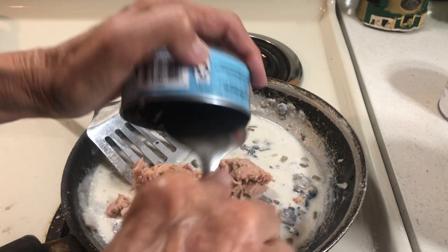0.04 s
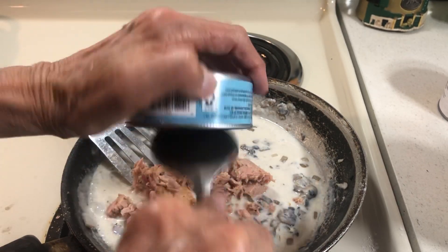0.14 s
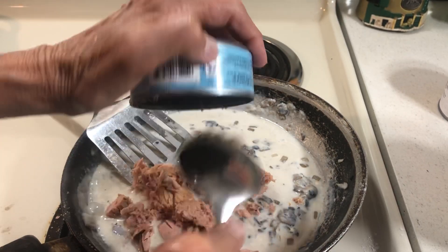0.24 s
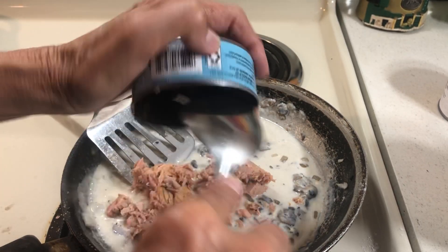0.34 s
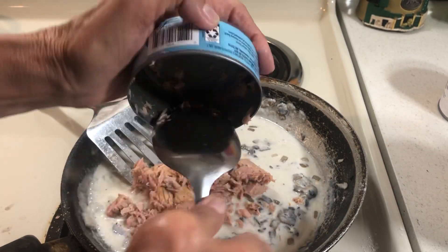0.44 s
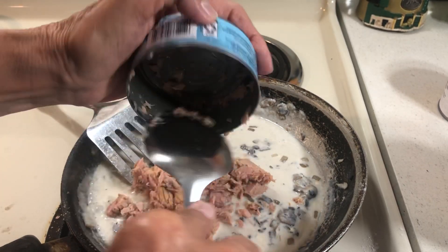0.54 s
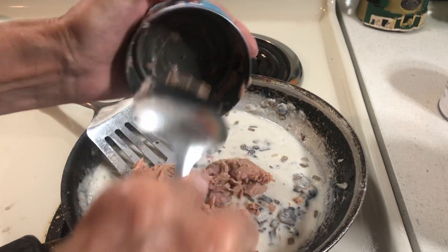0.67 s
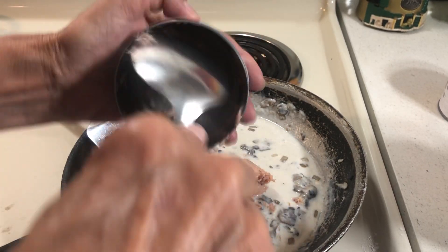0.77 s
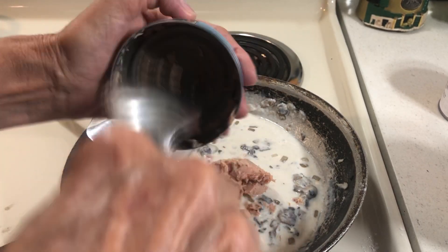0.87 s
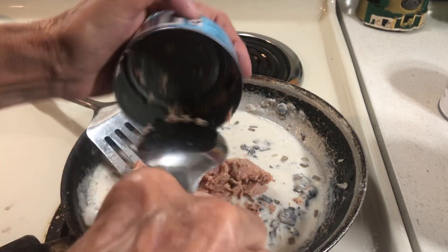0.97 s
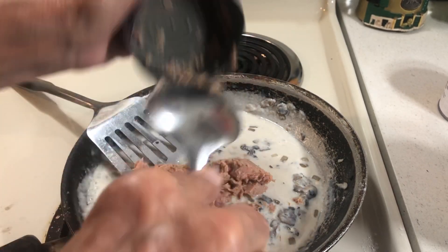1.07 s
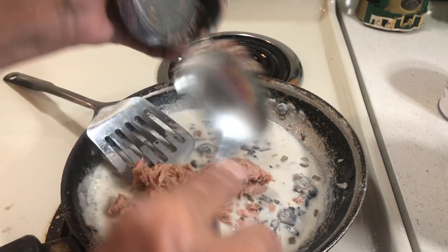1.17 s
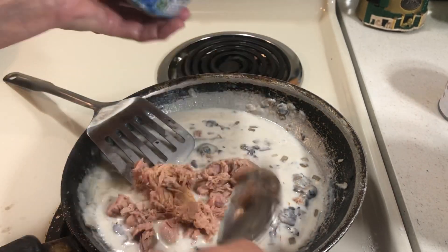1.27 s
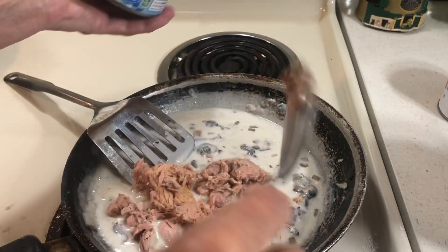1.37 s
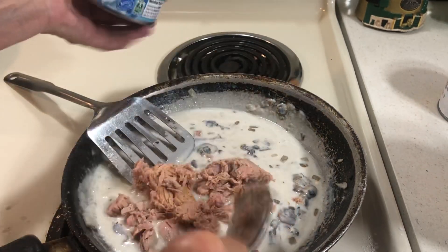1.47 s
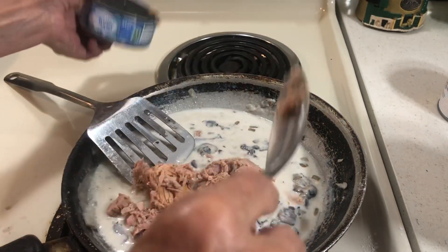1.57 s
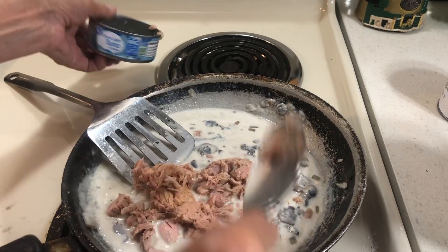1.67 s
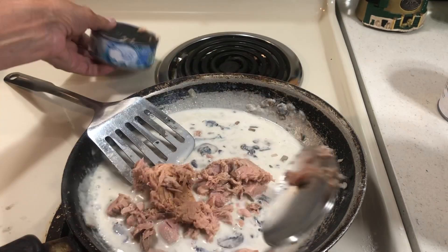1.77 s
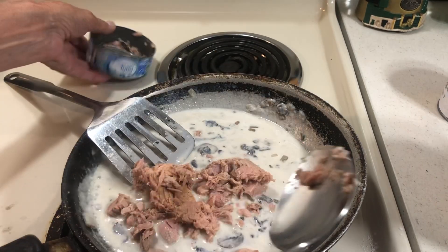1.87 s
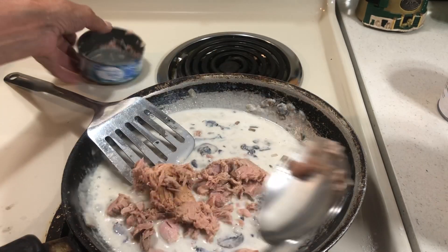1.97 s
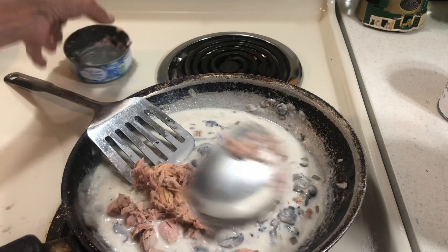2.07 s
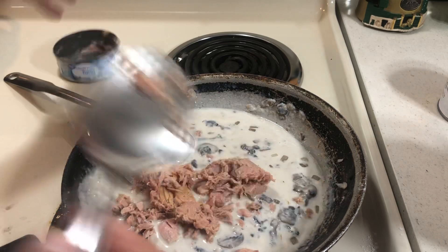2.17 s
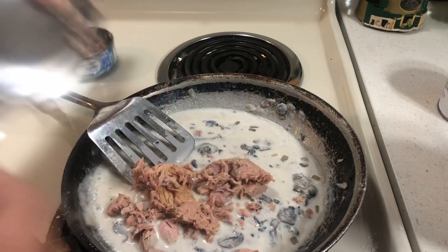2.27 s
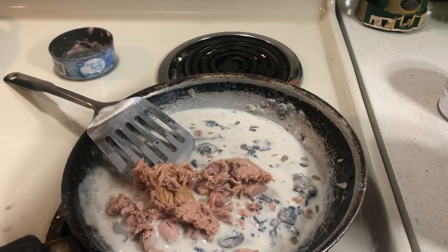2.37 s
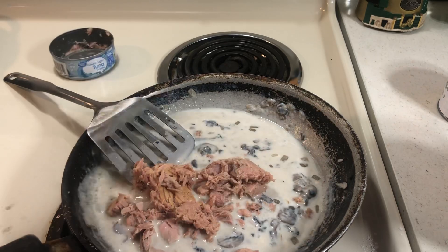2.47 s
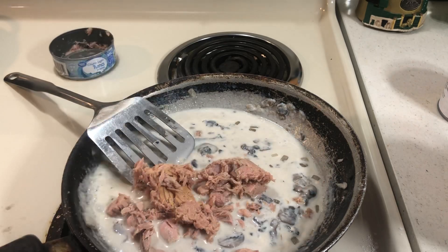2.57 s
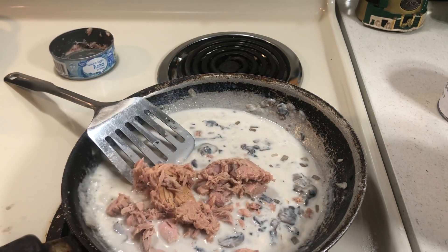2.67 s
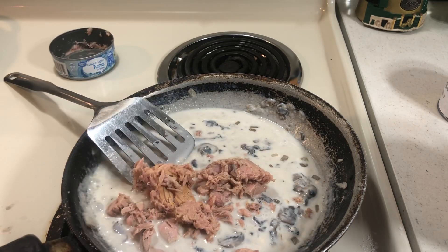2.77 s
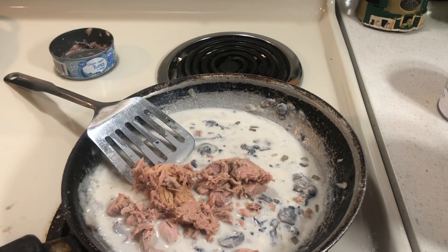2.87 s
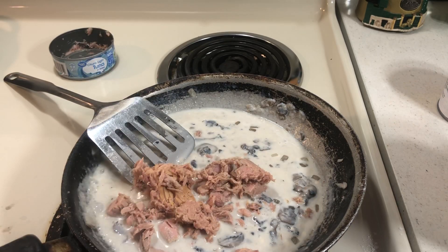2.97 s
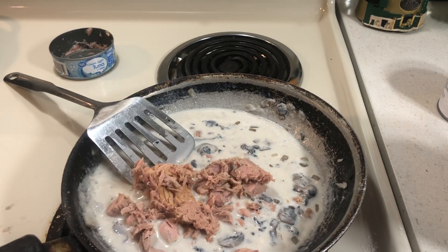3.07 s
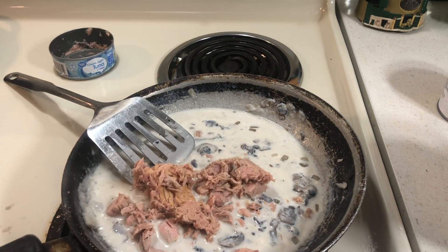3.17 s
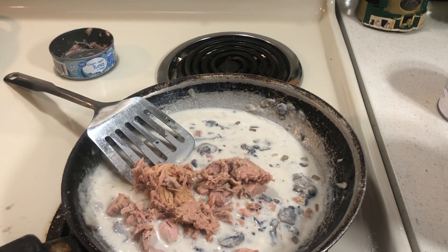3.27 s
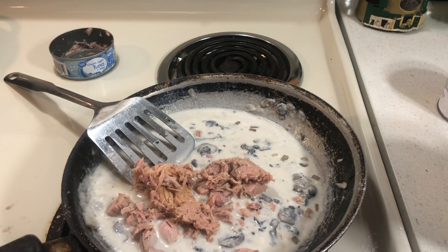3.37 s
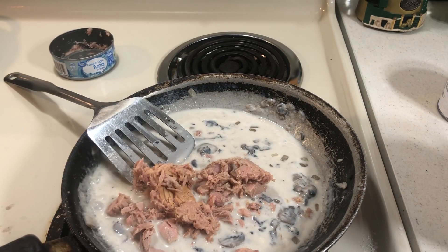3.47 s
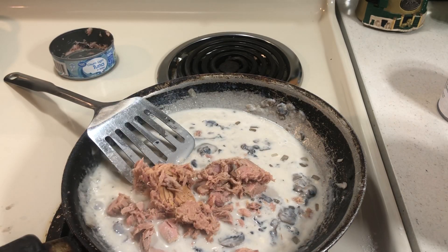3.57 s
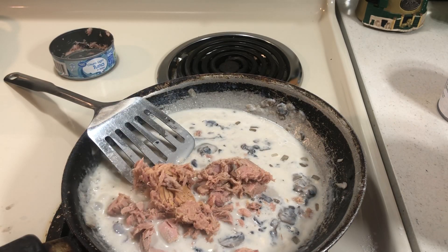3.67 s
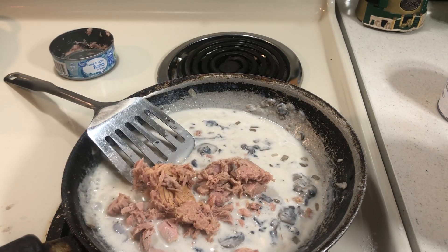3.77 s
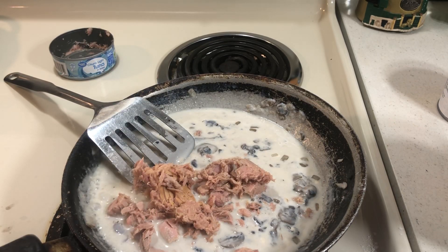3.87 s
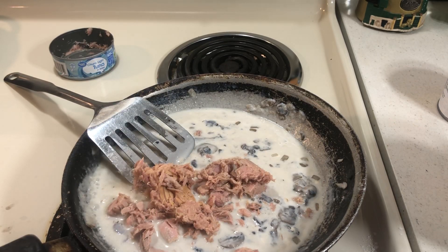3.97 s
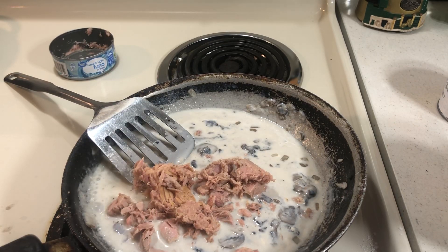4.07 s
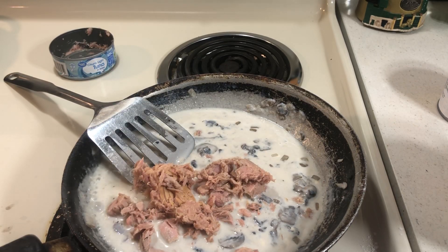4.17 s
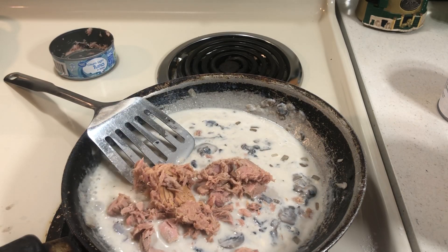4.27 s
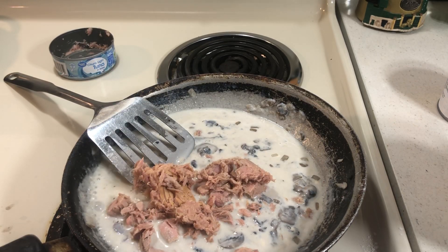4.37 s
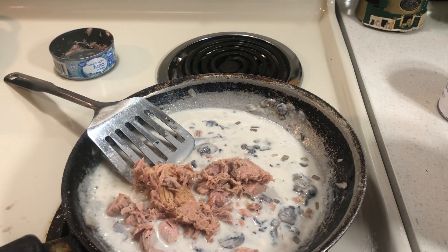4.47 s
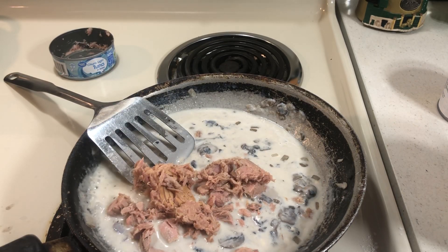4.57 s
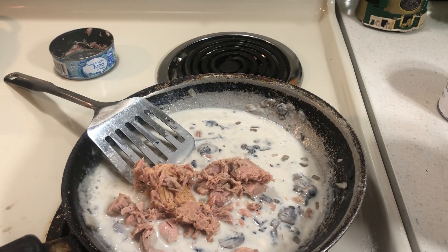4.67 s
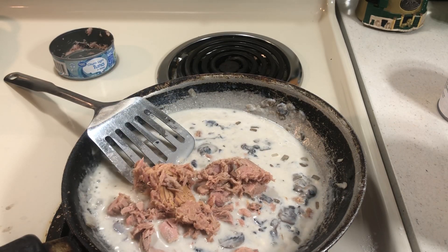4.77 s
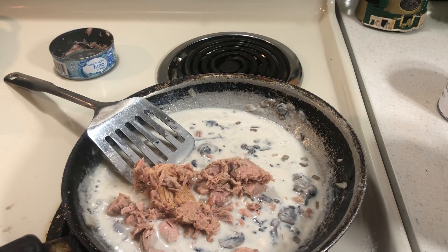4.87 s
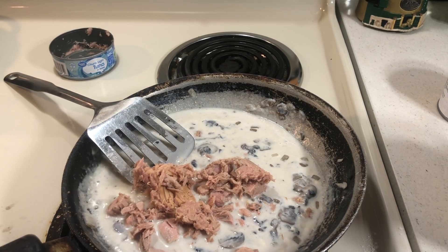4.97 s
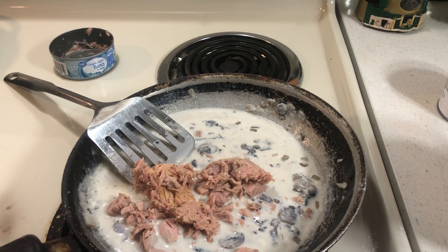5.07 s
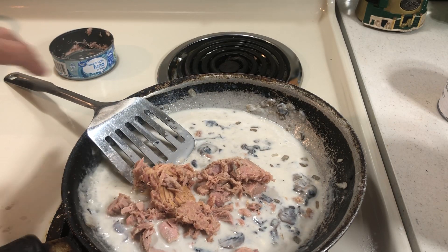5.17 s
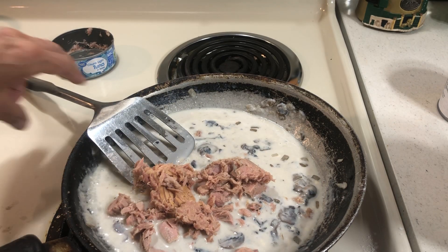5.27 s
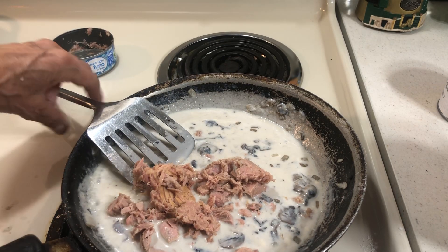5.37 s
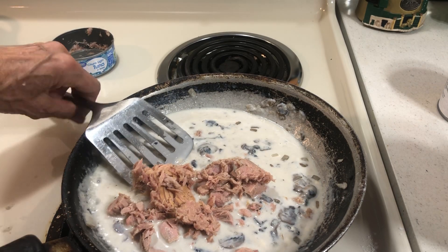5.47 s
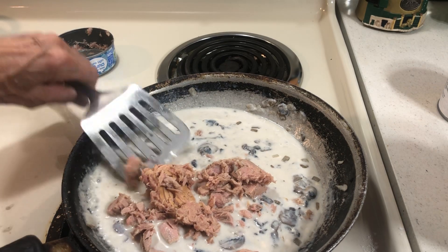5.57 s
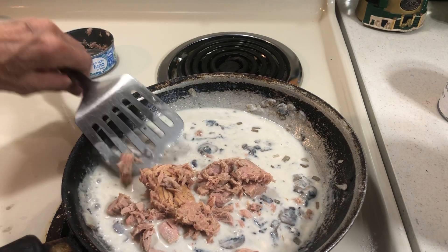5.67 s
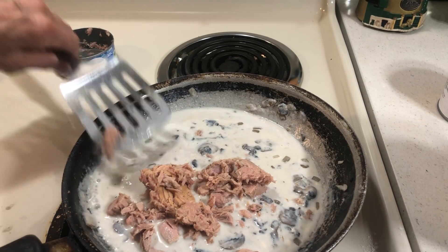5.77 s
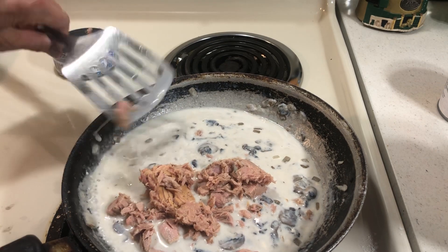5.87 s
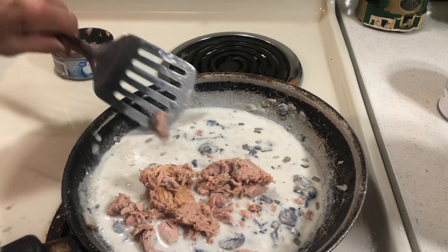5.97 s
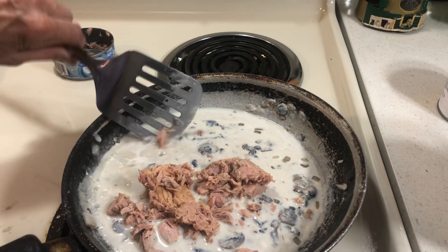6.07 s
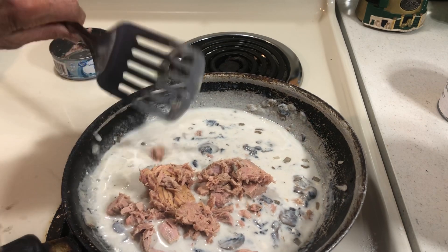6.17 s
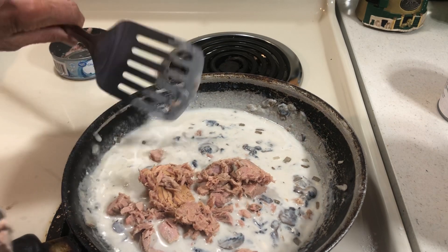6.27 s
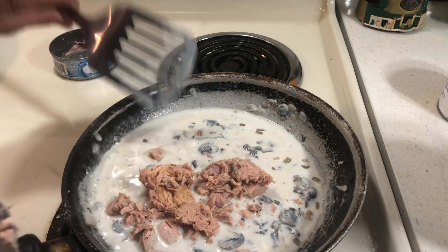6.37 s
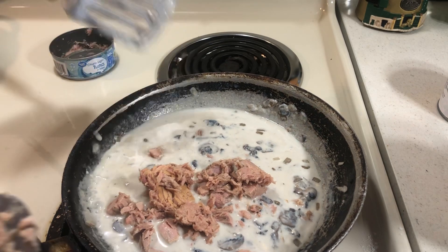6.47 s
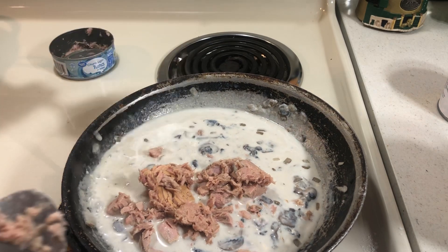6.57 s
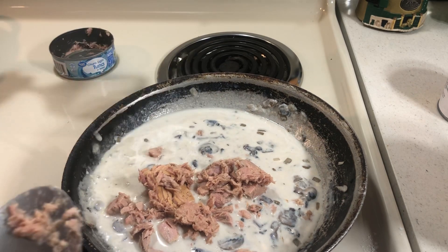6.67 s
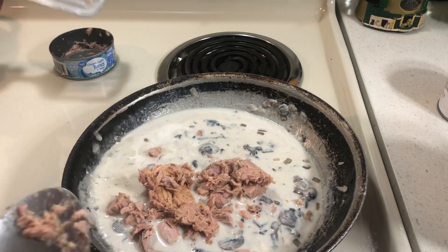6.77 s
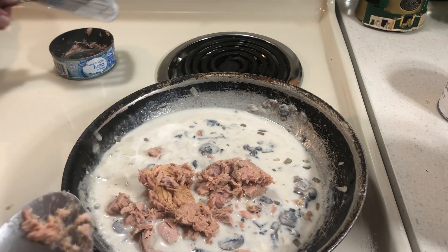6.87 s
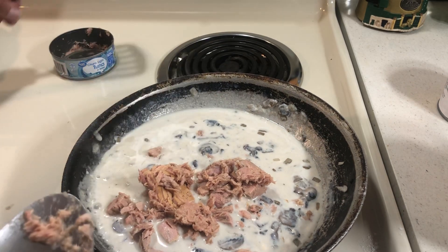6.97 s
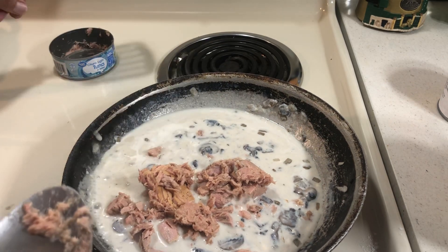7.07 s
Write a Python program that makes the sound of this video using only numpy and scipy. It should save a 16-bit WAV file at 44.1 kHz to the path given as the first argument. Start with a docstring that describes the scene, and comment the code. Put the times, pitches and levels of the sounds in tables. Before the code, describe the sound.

Quick tinny knocks and short gritty scrapes of a spoon on a can open the scene, followed by the can's hard landing and accelerating wobble on a stove. Then mostly gentle bubbling, faint sizzling flares and steady fan hum remain. Near the end a spatula softly taps the pan and is set down with a thin clink, followed by a small scrape. Close microphone, short indoor reverberation.

```python
"""A small kitchen, heard from just above a skillet of sauce; bubbles plop throughout over fan, hum and faint fizz.
First a steel spoon knocks and scrapes a tin: noise bursts and decaying modes for blows, random slips for scrapes.
Before two seconds the tin drops on the enamel stove top and rocks ever faster on its rolling rim.
From three seconds the fizz flares at times; near six a spatula taps the skillet, near seven it is laid down.
A last short scrape follows. Bubbles are rising sines with torn noise; the room is a decaying noise tail."""
import sys
import numpy as np
from scipy import signal
from scipy.fft import rfft, next_fast_len
from scipy.io import wavfile
from scipy.ndimage import uniform_filter1d

SR = 44100
rng = np.random.default_rng(int(sys.argv[2]) if len(sys.argv) > 2 else 0)


def unload_audio(sound):
    """Save the sound as a 16-bit wav file, at the path given as the first command line argument."""
    columns = np.transpose(np.atleast_2d(sound))
    # keep every value between -1 and 1, then stretch to whole-number steps
    steps = np.round(np.clip(columns, -1, 1) * 32767)
    wavfile.write(sys.argv[1], SR, steps.astype(np.int16))


N = 314433
TIME = np.arange(N) / SR

# Spoon on the tin's wall: (time [s], middle level [dB], treble against middle [dB], contact swell [s])
SPOON_BLOWS = [(.0092, -35, 7.5, .00012), (0.0276, -25, -1, 0.000078), (.414, -40, -8.5, 0.00102),
               (.436, -34.5, 8, 0.000058), (.443, -34, 4, .0002), (.465, -40, -1, .0003),
               (.759, -31, -11, .0017), (.768, -23, 2, 0.00026), (.9425, -26, -13.5, 0.000217),
               (.9485, -28.5, 8.5, 0.0000598), (1.609, -42, 1.5, .00005), (1.615, -42, -13, .0004)]
# Single blows, for the next three tables as well: (time [s], low level [dB], middle level [dB],
# high level [dB], clatter t60 [s], contact swell [s], ring against clatter [dB])
# Spoon on the tin's base
BASE_KNOCK = [(.3787, -35.5, -21, -32.5, 0.016, 0.000276, 2.5)]
# Tin dropped on the stove top: columns as for single blows
TIN_LANDING = [(1.832, -22.5, -10.5, -19, 0.238, 0.000061, 1)]
# Spatula tapping the skillet: columns as for single blows
SKILLET_TAP = [(6.0397, -32.5, -33, -47.5, 0.075, 0.000097, 0)]
# Spatula laid down: columns as for single blows
SPATULA_LAID = [(6.9457, -46.5, -36, -25.5, 0.109, 0.00066, -1.37),
                (6.958, -58, -39.5, -34, 0.13, 0.0013, 2.05)]
# The tin rocking on its rim: (time [s], middle level [dB])
ROCKS = [(2.003, -21.5), (2.106, -20.5), (2.200, -21), (2.286, -19), (2.358, -16), (2.411, -18),
         (2.443, -23.5)]
# Strokes of steel over metal: (peak time [s], level [dB], rise by 20 dB [s], fall by 20 dB [s])
SCRAPE_STROKES = [(0, -40, .02, 0.0751), (.533, -41.5, 0.0633, 0.0147), (.908, -28, 0.0433, 0.048),
                  (0.943, -34.5, 0.0009, 0.1215), (1.5, -63, 0.44, 0.38), (7.13, -40, 0.0492, .05)]
# Edges between the low, middle and high bands of a blow: (lower [Hz], upper [Hz])
BLOW_BANDS = 800, 3300

# Mode tables hold nominal values, which each contact detunes, weights and damps.
# Modes of the tin's wall: (frequency [Hz], level [dB], t60 [s])
WALL_MODES = [(535.5, 0.5, 0.196), (1473.8, 1.5, 0.174), (1558.3, -5, 0.16813), (1664, -8.5, 0.086),
              (2088, 1, 0.143), (2210, -10.5, .08), (2737, 3.5, 0.1), (2867, -0.5, 0.11),
              (3530, -12.5, 0.34), (3930, -14.5, .22), (4537, 4.5, 0.042), (4548, 1, 0.11),
              (4470, -9, 0.278), (4697, 0.5, 0.091), (5350, -19.5, 0.155), (5796, 3.5, 0.091),
              (6365, -4.5, 0.092), (8282, -10.5, 0.1087), (8210, -11, 0.13), (8520, -19, .2),
              (8640, -15.5, .13), (9195, -21.5, .2), (12050, -8.5, 0.0698)]
# Modes of the tin's flat base: (frequency [Hz], level [dB], t60 [s])
BASE_MODES = [(642.3, -2.5, 0.098), (1197, 3, 0.1044), (1746, 2.5, 0.037), (1854, -5, .05),
              (2280, -7.5, 0.065), (2683, -4.5, 0.067), (3670, -11.5, 0.098), (4350, -17.5, 0.084),
              (6240, -15.5, .04), (8600, -18.5, 0.045)]
# Modes of the spoon's bowl: (frequency [Hz], level [dB], t60 [s])
BOWL_MODES = [(1899, -11, .1), (4460, -5, .09), (4440, -3.5, .08), (4534, -1.5, 0.12), (4628, -6, .15),
              (4774, -8, .12), (8230, -11, 0.1), (8410, -10, 0.11255), (8790, -12.5, 0.1036)]
# Modes of tin and stove top together: (frequency [Hz], level [dB], t60 [s])
STOVE_MODES = [(322, -28, 0.18), (428.57, -16, 0.18), (485.56, 0, 0.553), (565, 6.5, 0.28),
               (845.3, 3, 0.23), (905.2, 2, 0.313), (928, 3, 0.393), (1057.5, 1.5, 0.287),
               (1159.2, -7, 0.533), (1270, -17.5, .22), (1408, -3.5, 0.141), (1506, 14.5, 0.124),
               (1704, 7, 0.122), (1753, -7.5, .22), (1940, -17.5, 0.21), (1950, -21.5, .2),
               (2542, 0.5, 0.185), (2590, -17.5, 0.21), (3200, -19, 0.18606), (3520, -3, 0.1903),
               (4494, 0, 0.12), (4482.9, 0.5, 0.124), (4430, -22, 0.11), (5910, -9.5, 0.182),
               (6070, -1.5, 0.11), (7550, -10.5, .14)]
# Modes of the skillet: (frequency [Hz], level [dB], t60 [s])
SKILLET_MODES = [(276.3, 9.5, 0.111), (365, -6, 0.1), (857, -17.5, 0.082), (1200, -2, 0.15),
                 (1309, 3.5, 0.08), (2130, -11, 0.095), (5120, -12, 0.076), (5890, -13.5, .08)]
# Modes of the spatula: (frequency [Hz], level [dB], t60 [s])
SPATULA_MODES = [(1190, -29, .3), (1620, -24, .15), (1960, -13, .55), (2546, -17, .19), (2780, -16, .11),
                 (2993, -26, .35), (3284, -18, .19), (3700, -18, .19), (4199, -15, .16), (4400, -16, .14),
                 (5362, -1, .15), (5381, -7, .14), (5744, -13, .14), (6406, -17, .19), (6783, -14, .17),
                 (7397, -17, .17), (9292, -18, .17), (11760, -18, .16)]

# Colour of the wall's dense, short-lived modes: (frequency [Hz], level [dB])
WALL_TINT = [(100, -21), (250, -1.5), (550, -2.5), (800, -8.5), (1450, 9), (2330, -6.5), (3600, 6),
             (4600, 4.5), (5400, -1.5), (6800, 0.5), (8500, 4), (10500, -8), (12500, -1.5), (16000, -26.5)]
# Colour of the base's dense modes: (frequency [Hz], level [dB])
BASE_TINT = [(100, -15), (300, 12), (700, 0.5), (1250, -3.5), (2000, 3.5), (3500, -12), (5000, -10.5),
             (8500, -26), (10000, -30.5), (16000, -46)]
# Colour of the dense modes of tin and stove top: (frequency [Hz], level [dB])
STOVE_TINT = [(130, -34.5), (220, -3), (330, 5.5), (500, 2), (680, -2), (950, 4), (1550, 0), (2200, -1.5),
              (3500, -8.5), (4100, -20), (5100, -21), (6000, -13), (12000, -19.5), (16000, -35.5)]
# Colour of the skillet's dense modes: (frequency [Hz], level [dB])
SKILLET_TINT = [(100, -20.5), (280, 14.5), (550, -0.5), (1250, -4), (2000, -16), (3800, -23), (5500, -20.5),
                (8500, -24.5), (16000, -38)]
# Colour of the spatula's dense modes: (frequency [Hz], level [dB])
SPATULA_TINT = [(200, -10.5), (1200, -11.5), (2000, -20.5), (2800, -2.5), (4300, -6), (8000, 0.5),
                (12000, -2), (16000, -6.5)]
# Colour of the scraping slips: (frequency [Hz], level [dB])
SCRAPE_TINT = [(1000, -11.5), (1900, -6.5), (3300, 0), (4300, -3), (4850, -8.5), (5600, 1), (7000, -9.5),
               (8600, 0.5), (11000, -8.5), (14000, -7.5), (16000, -15.5)]

# The largest bubbles: (time [s], level before their common gain [dB], starting pitch [Hz])
LARGE_BUBBLES = [(1.638, -38, 675), (1.813, -33, 658), (2.674, -39, 684), (2.816, -39.5, 594),
                 (2.884, -40, 595), (3.368, -38.5, 624), (3.735, -35, 573), (4.127, -40.5, 643),
                 (4.195, -39, 559), (4.737, -38, 595), (5.209, -31, 626), (5.692, -39, 682),
                 (5.751, -36, 649), (6.603, -36, 641), (6.681, -35, 645), (6.737, -37, 584),
                 (6.835, -37, 616.4), (7.018, -38, 553)]
# Flares of fizz at the skillet's hot edge: (time [s], level [dB], half length [s])
FIZZ_FLARES = [(3.014, -61.5, 0.0455), (3.3, -67.5, 0.33), (4.474, -66, 0.149), (4.903, -55.5, 0.0248),
               (5.09, -60, 0.091), (5.484, -60, 0.059)]
# Spectrum of the kitchen air: (frequency [Hz], level [dB])
AIR_TINT = [(20, -10.5), (45, -5.5), (75, 3.5), (170, -1.5), (250, 5.5), (420, 2), (650, 1), (1000, -4),
            (1400, -10), (1900, -14.5), (2800, -17.5), (6000, -22.5), (10000, -29.5), (16000, -36.5)]
# Fan resonances: (frequency [Hz], width [Hz], rms level [dB])
FAN_RESONANCES = [(481.6, 12, -61.5), (1418.7, 30.9, -67), (2363, 112.8, -67.5), (3322.7, 420, -71)]
# Motor hum: (frequency [Hz], mean rms level [dB])
HUM_TONES = [(57.6, -66), (114, -68), (119.9, -52.5), (151.5, -70), (222.5, -63), (239.8, -62)]


def amp(db):
    """Decibels to gain."""
    return 10 ** (np.asarray(db) / 20)


def unit(x):
    """Scale to rms 1."""
    return x / np.sqrt(np.mean(x ** 2) + 1e-20)


def fade(t, t60):
    """Free decay by 60 dB in t60 seconds, from t = 0 on."""
    return np.exp(-np.log(1000) * np.maximum(t, 0) / t60)


def add(out, at_s, x):
    """Mix x into out from the given time."""
    i = int(round(at_s * SR))
    x, i = x[max(-i, 0):], max(i, 0)
    out[i:i + len(x)] += x[:max(len(out) - i, 0)]


def tint(x, colour):
    """Multiply the spectrum of x by a curve of (Hz, dB) points, at rms 1."""
    hz, db = np.transpose(colour)
    size = next_fast_len(len(x))
    f = np.maximum(np.fft.rfftfreq(size, 1 / SR), 1)
    gain = amp(np.interp(np.log(f), np.log(hz), db))
    return unit(np.fft.irfft(rfft(x, size) * gain, size)[:len(x)])


def band(x, hz, kind):
    """Third-order Butterworth filter."""
    return signal.sosfilt(signal.butter(3, hz, kind, fs=SR, output="sos"), x)


def walk(rate, size=N):
    """Smooth random wander of spread near 1, with `rate` new values a second."""
    k = int(SR / rate)
    steps = np.repeat(rng.standard_normal(size // k + 1), k)
    return 1.3 * uniform_filter1d(steps, k)[:size]


def ring(modes, t, damping=1, detune=0.0018):
    """Decaying modes; each contact weights and detunes them a little, and damping divides their t60."""
    hz, db, t60 = np.transpose(modes)[:, :, None]
    weight, shift, phase = rng.standard_normal((len(modes), 3)).T[:, :, None]
    tones = np.sin(2 * np.pi * (hz * (1 + detune * shift) * t + phase))
    return np.sum(amp(db + 2 * weight) * fade(t * damping, t60) * tones, axis=0)


def blows(table, modes, colour, crack_db, crack_t60, damping, detune, lowest_hz=200):
    """Each blow is a bright crack, a clatter of dense modes and a ring, balanced in three bands."""
    out, t = np.zeros(N), np.arange(-SR // 50, SR // 2) / SR
    low_edge, high_edge = BLOW_BANDS
    for at_s, low_db, mid_db, high_db, t60, swell, ring_db in table:
        contact = .5 + .5 * np.tanh(t / (2 * swell))
        clatter = unit(contact * fade(t, t60) * tint(rng.standard_normal(len(t)), colour))
        bright = band(rng.standard_normal(len(t)), (900, 13000), "band")
        crack = unit(contact * fade(t, crack_t60 + 10 * swell) * bright)
        body = unit(contact * ring(modes, t, damping, detune))
        hit = clatter + amp(crack_db) * crack + amp(ring_db) * body
        # small objects radiate no bass
        low = amp(low_db) * unit(band(hit, (lowest_hz, low_edge), "band"))
        mid = amp(mid_db) * unit(band(hit, (low_edge, high_edge), "band"))
        high = amp(high_db) * unit(band(hit, high_edge, "high"))
        # a level is the band's whole energy, taken as if it lasted 20 ms
        spread = np.sqrt(.02 * SR / len(t))
        add(out, at_s + t[0], spread * (low + mid + high))
    return out


def spoon_contacts(firm_db=-25, bass_db=-3.5, bass_per_db=0.67, t60=.027, growth_per_db=0.0187, ring_db=-4.5):
    """Rows for blows: a firmer stroke flexes the tin's base for more bass, and its clatter lasts longer."""
    rows = []
    for at_s, db, treble_db, swell in SPOON_BLOWS:
        firmness = db - firm_db
        low_db = db + bass_db + bass_per_db * firmness
        clatter_t60 = t60 * np.exp(growth_per_db * firmness)
        rows.append((at_s, low_db, db, db + treble_db, clatter_t60, swell, ring_db))
    return rows


def bowl(ring_db=-11, ring_per_treble_db=2.0, detune=.006):
    """The spoon's own modes: the sharper a contact, the more it rings the spoon itself."""
    out, t = np.zeros(N), TIME[:SR // 2]
    for at_s, db, treble_db, swell in SPOON_BLOWS:
        level = amp(db + ring_db + ring_per_treble_db * treble_db)
        add(out, at_s, level * np.tanh(t / (2 * swell)) * ring(BOWL_MODES, t, detune=detune))
    return out


def friction(force, modes, colour, slips_per_s, rough_db, ring_db, low_hz):
    """Tiny uneven slips, as strong as the stroke, excite metal that the lasting contact damps."""
    slips = (rng.random(N) < slips_per_s / SR) * rng.standard_normal(N)
    slips = slips * amp(rough_db * walk(400))
    body = unit(signal.fftconvolve(slips, ring(modes, TIME[:SR // 8], damping=6))[:N])
    rub = tint(slips, colour) + amp(ring_db) * body
    return force * unit(band(rub, low_hz, "high"))


def stroke(start_s, end_s, db, rise_s, fall_s):
    """Force of a rubbing contact: it grows, holds from start to end, and dies away."""
    before = np.maximum(start_s - TIME, 0) / rise_s
    after = np.maximum(TIME - end_s, 0) / fall_s
    return amp(db - 20 * (before + after))


def scraping_force():
    """Each stroke bites, peaks and slips off."""
    return sum(stroke(at_s, at_s, db, rise_s, fall_s) for at_s, db, rise_s, fall_s in SCRAPE_STROKES)


def rocking_contacts(bass_db=-11.5, treble_db=-4.5, t60=0.1232, swell_s=0.001197, swing_s=.1,
                     swell_power=1.59, ring_db=-4.0):
    """Rows for blows: the rim rolls into each landing, the more gently the longer the swing before it."""
    rows, previous_s = [], TIN_LANDING[0][0]
    for at_s, db in ROCKS:
        swell = swell_s * ((at_s - previous_s) / swing_s) ** swell_power
        rows.append((at_s, db + bass_db, db, db + treble_db, t60, swell, ring_db))
        previous_s = at_s
    return rows


def rolling_force(level_db=-41.5, rise_s=.06, fall_s=0.14):
    """The rim rolls evenly on the enamel from the first rock to the last."""
    return stroke(ROCKS[0][0], ROCKS[-1][0], level_db, rise_s, fall_s)


def plop(hz, t60=0.04014, glide=1.2, swell=0.001713, burst_db=-15, burst_t60=0.0826):
    """A bubble opens: its cavity rings for a few cycles, rising, while the wet skin tears."""
    t = TIME[:SR // 10]
    cavity = np.sin(2 * np.pi * hz * t * (1 + glide * t)) * fade(t, t60)
    skin = unit(band(rng.standard_normal(len(t)), (500, 1600), "band")) * fade(t, burst_t60)
    opening = 1 - np.exp(-(t / swell) ** 2)
    return opening * (cavity + amp(burst_db) * skin)


def sauce(large_db=7, small_db=-41, size_db=6, lowest_hz=565, pitch_spread=.25, count=150):
    """A few large bubbles among many small ones, some of them higher in pitch."""
    out = np.zeros(N)
    for at_s, db, hz in LARGE_BUBBLES:
        add(out, at_s, amp(db + large_db) * plop(hz))
    for at_s in rng.uniform(0, N / SR, count):
        size, pitch = rng.standard_normal(2)
        hz = lowest_hz * np.exp(pitch_spread * abs(pitch))
        add(out, at_s, amp(small_db + size_db * np.tanh(size)) * plop(hz))
    return out


def sizzle(steady_db=-73, flicker_db=1.32, pops_per_s=3500):
    """Random pops as fine fizz at the pan's hot edge: a faint flickering bed with short flares."""
    pops = (rng.random(N) < pops_per_s / SR) * rng.standard_normal(N)
    power = amp(steady_db) ** 2
    for at_s, db, half_s in FIZZ_FLARES:
        power = power + amp(db) ** 2 * np.exp(-2 * ((TIME - at_s) / half_s) ** 2)
    return np.sqrt(power) * amp(flicker_db * walk(40)) * unit(band(pops, (3500, 12000), "band"))


def room(x, wet_db=-12, t60_low=0.2686, t60_high=0.218, treble_db=-3, first_s=0.0017):
    """Reflections from stove back, counter and walls; the treble dies first."""
    t = TIME[:SR // 2]
    noise = rng.standard_normal(len(t))
    low = band(noise, 3200, "low") * fade(t, t60_low)
    high = amp(treble_db) * band(noise, 3010, "high") * fade(t, t60_high)
    tail = unit((low + high) * (t > first_s)) / np.sqrt(len(t))
    return x + amp(wet_db) * signal.fftconvolve(x, tail)[:N]


def kitchen(air_db=-50, waver_db=0.5, air_waver_db=1.0):
    """Moving air and fan resonances are filtered noise; a motor's hum is wavering sines."""
    out = amp(air_db + air_waver_db * walk(8)) * tint(rng.standard_normal(N), AIR_TINT)
    for hz, width, db in FAN_RESONANCES:
        b, a = signal.iirpeak(hz, hz / width, fs=SR)
        out += amp(db) * unit(signal.lfilter(b, a, rng.standard_normal(N)))
    for hz, db in HUM_TONES:
        tone = unit(np.sin(2 * np.pi * (hz * TIME + rng.random())))
        out += amp(db + waver_db * walk(4.405)) * tone
    return out


def scene():
    """All the work at the stove, heard from just above the skillet."""
    spoon = blows(spoon_contacts(), WALL_MODES, WALL_TINT,
                  crack_db=-5.5, crack_t60=0.0125, damping=1, detune=0.00301)
    knock = blows(BASE_KNOCK, BASE_MODES, BASE_TINT,
                  crack_db=-25, crack_t60=.012, damping=1, detune=0.0018)
    scrape = friction(scraping_force(), BOWL_MODES, SCRAPE_TINT,
                      slips_per_s=9700, rough_db=2.5, ring_db=-0.5, low_hz=1490)
    # each landing on a new part of the rim shifts the tin's modes; the stove top damps them
    tin = blows(TIN_LANDING + rocking_contacts(), STOVE_MODES, STOVE_TINT,
                crack_db=-8.0, crack_t60=0.0377, damping=1.47, detune=0.01337)
    roll = friction(rolling_force(), STOVE_MODES, STOVE_TINT,
                    slips_per_s=2700, rough_db=2, ring_db=-2, low_hz=400)
    tap = blows(SKILLET_TAP, SKILLET_MODES, SKILLET_TINT,
                crack_db=-35, crack_t60=0.0151, damping=1.21, detune=0.00184)
    clink = blows(SPATULA_LAID, SPATULA_MODES, SPATULA_TINT,
                  crack_db=-16, crack_t60=0.041, damping=0.836, detune=0.00026)
    stove_work = spoon + bowl() + knock + scrape + tin + roll + tap + clink + sauce()
    return (room(stove_work) + sizzle() + kitchen())[None]


def record(dry, top_hz=15800):
    """The recorder thins the deepest bass, holds the peaks within full scale and cuts the top."""
    held = np.clip(band(dry, 45, "high"), -.95, .95)
    return signal.sosfilt(signal.ellip(8, .2, 70, top_hz, fs=SR, output="sos"), held)


dry = scene()
out = record(dry)
unload_audio(out)
```